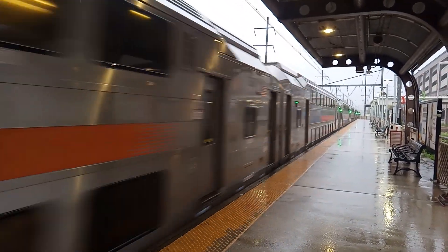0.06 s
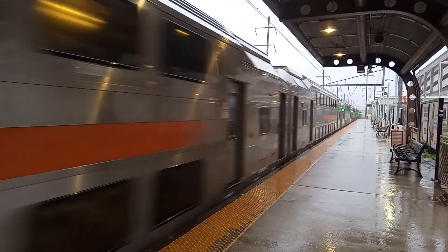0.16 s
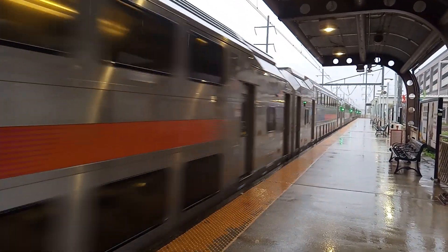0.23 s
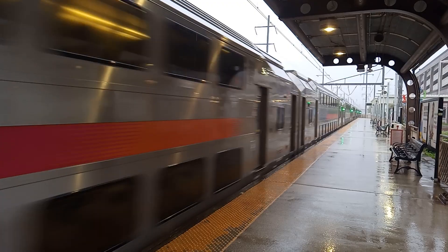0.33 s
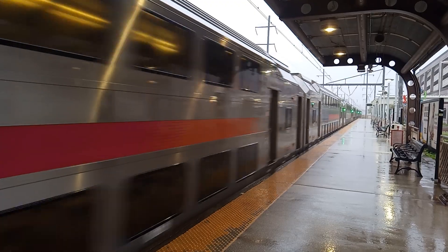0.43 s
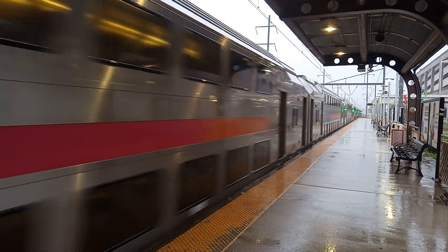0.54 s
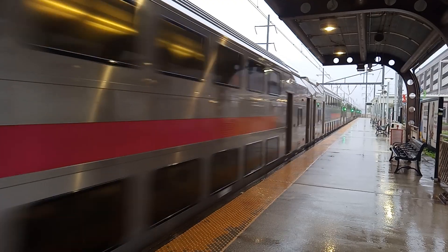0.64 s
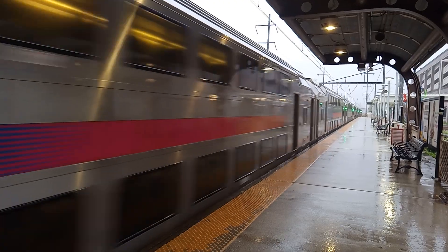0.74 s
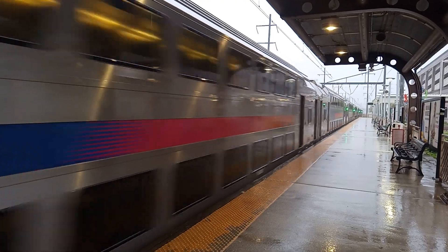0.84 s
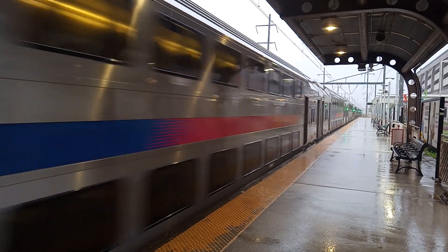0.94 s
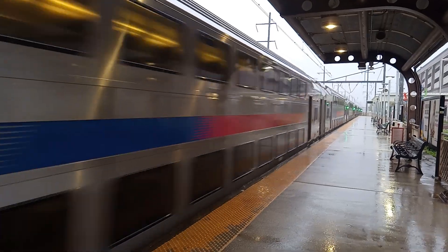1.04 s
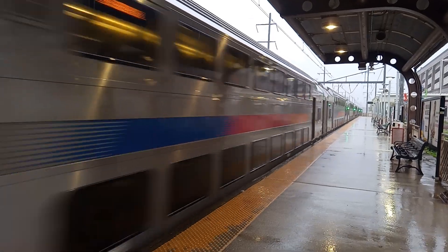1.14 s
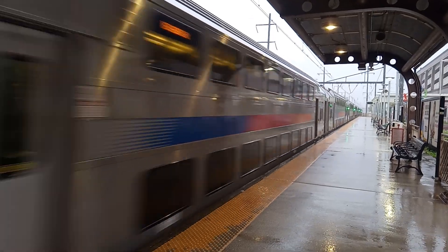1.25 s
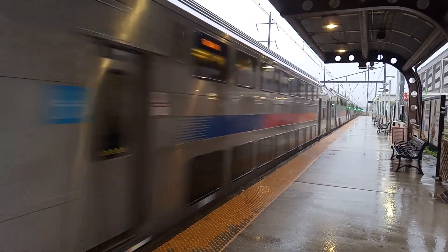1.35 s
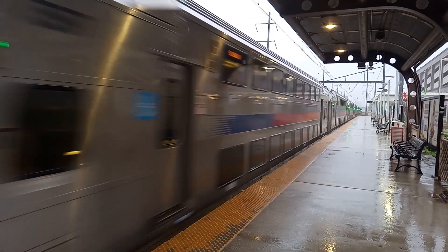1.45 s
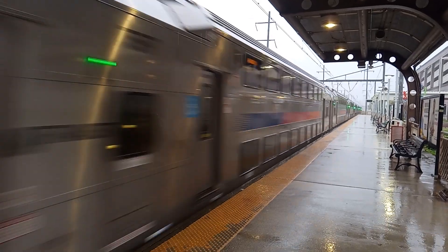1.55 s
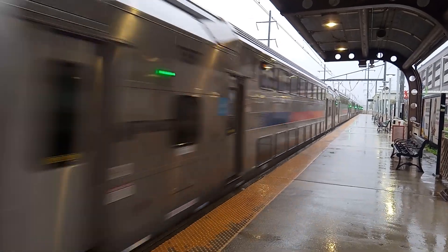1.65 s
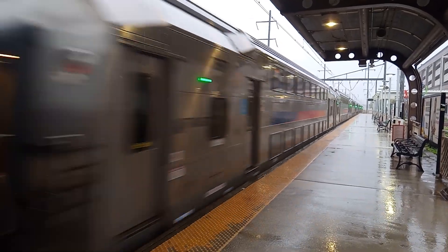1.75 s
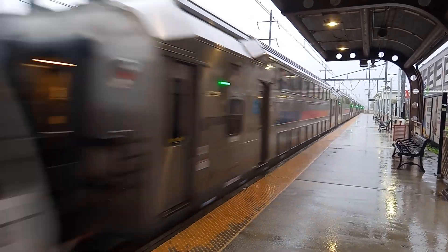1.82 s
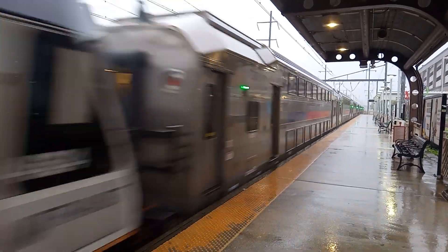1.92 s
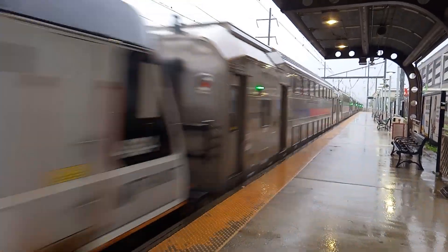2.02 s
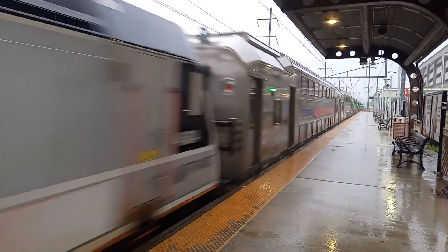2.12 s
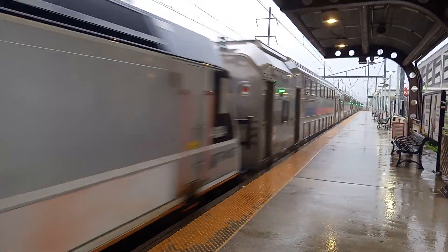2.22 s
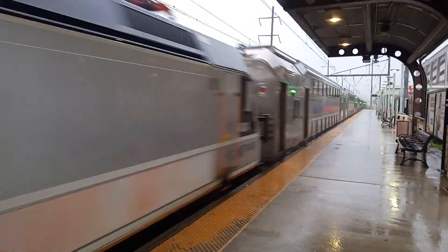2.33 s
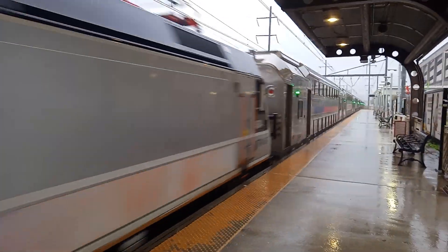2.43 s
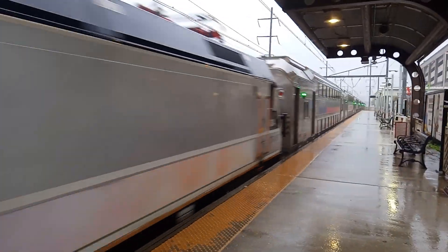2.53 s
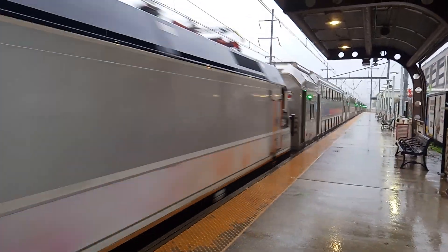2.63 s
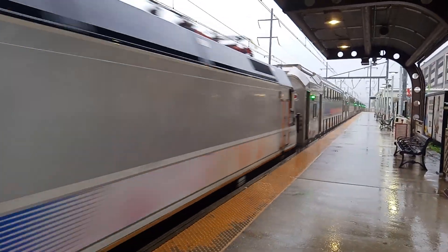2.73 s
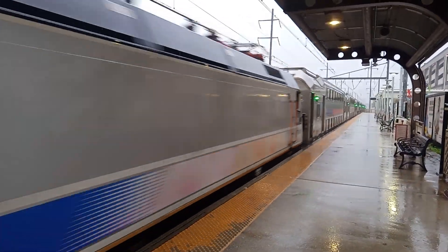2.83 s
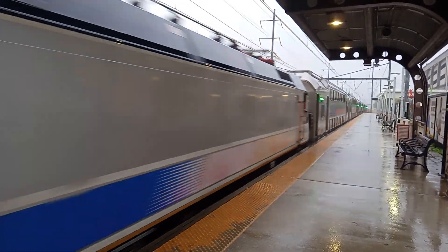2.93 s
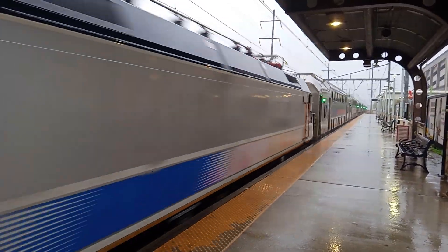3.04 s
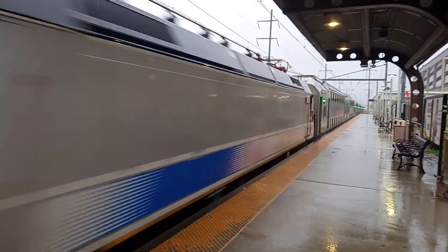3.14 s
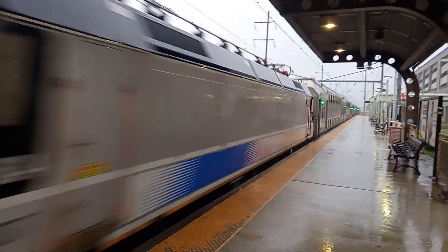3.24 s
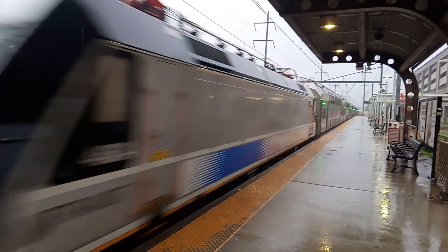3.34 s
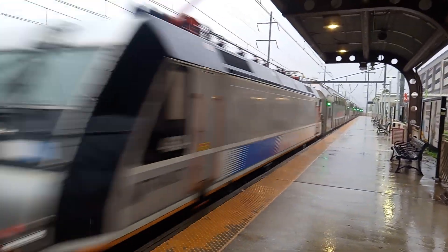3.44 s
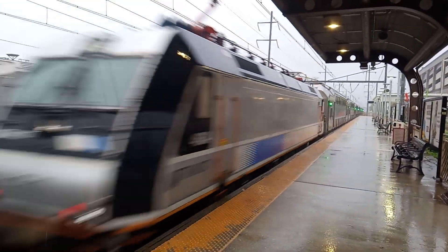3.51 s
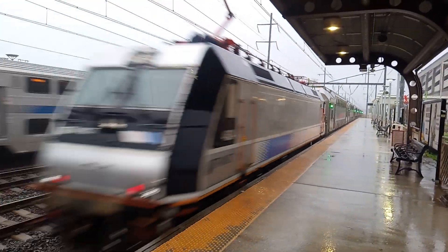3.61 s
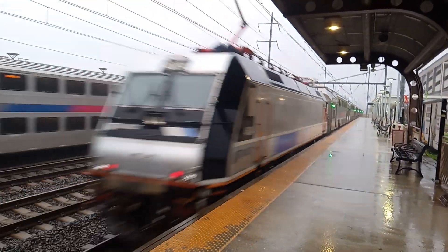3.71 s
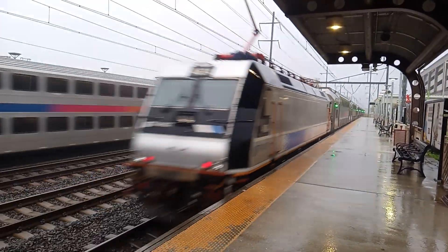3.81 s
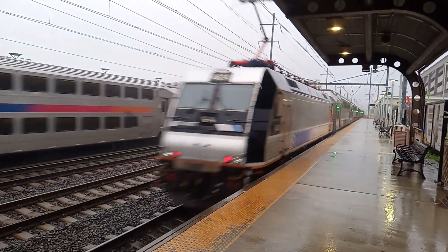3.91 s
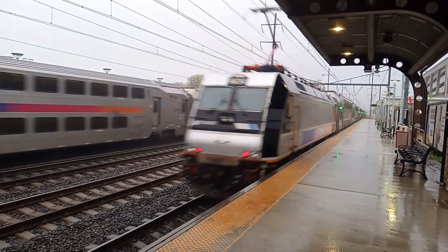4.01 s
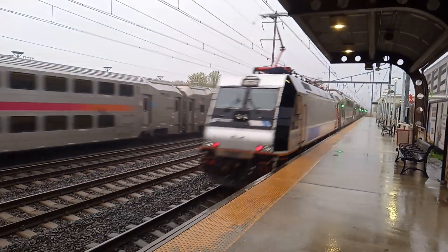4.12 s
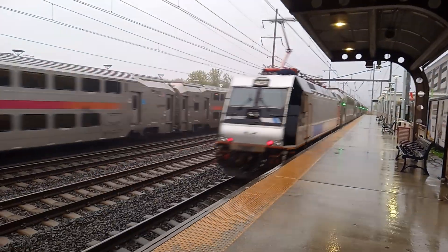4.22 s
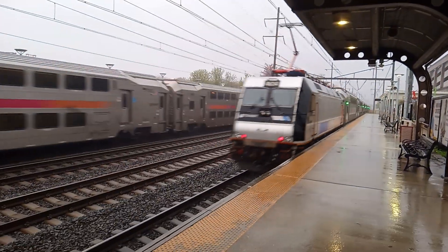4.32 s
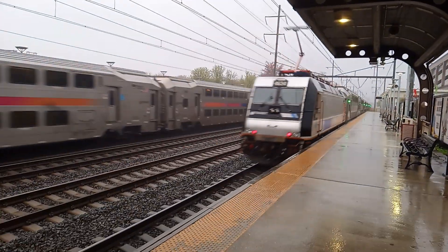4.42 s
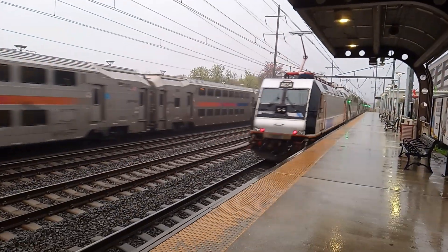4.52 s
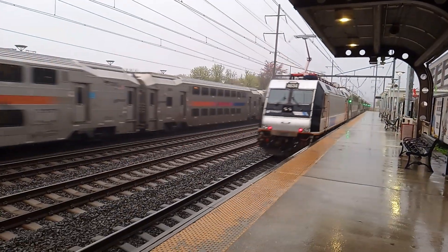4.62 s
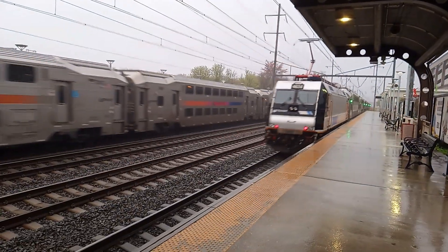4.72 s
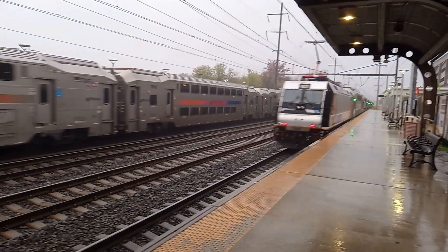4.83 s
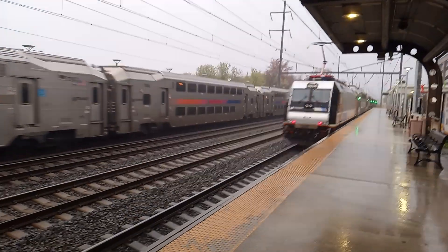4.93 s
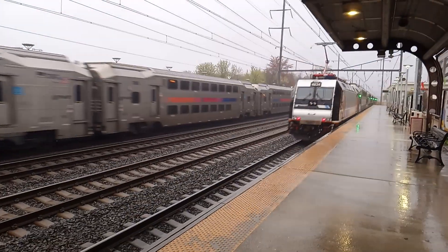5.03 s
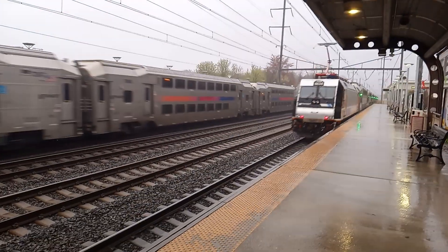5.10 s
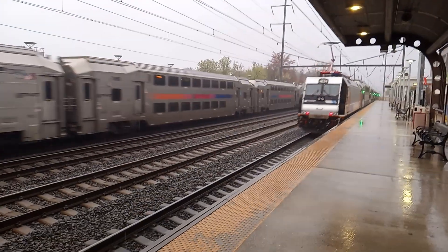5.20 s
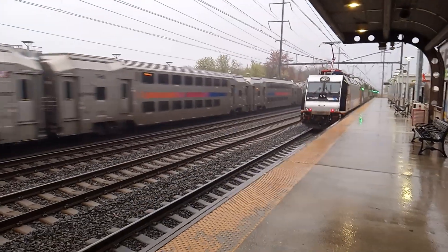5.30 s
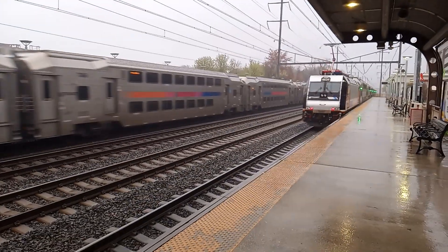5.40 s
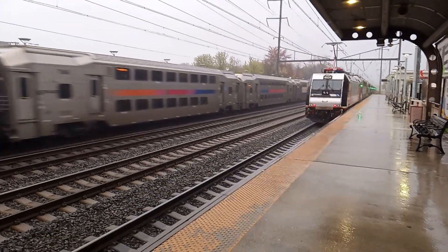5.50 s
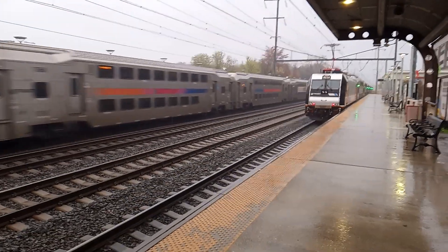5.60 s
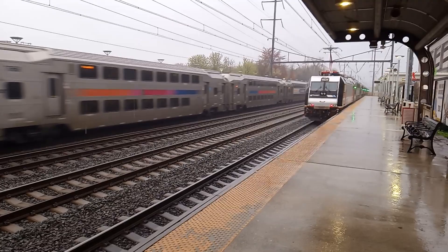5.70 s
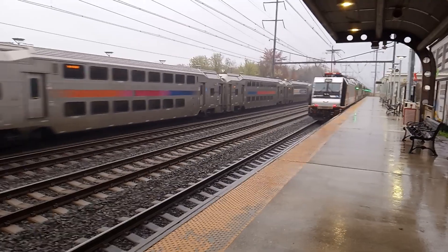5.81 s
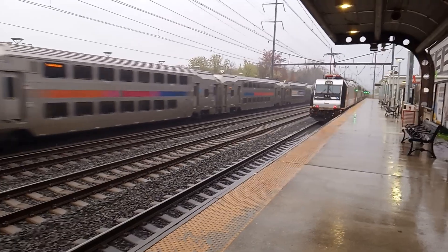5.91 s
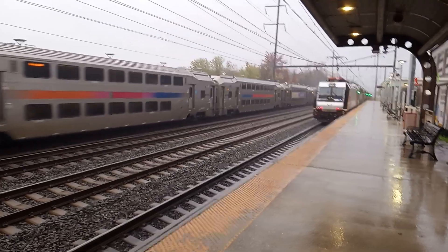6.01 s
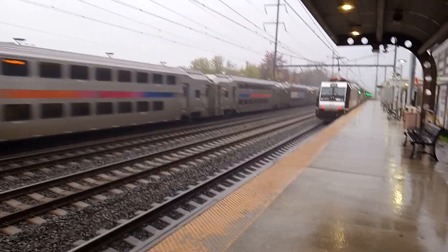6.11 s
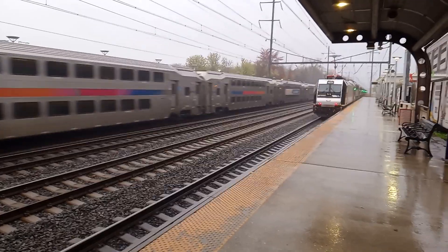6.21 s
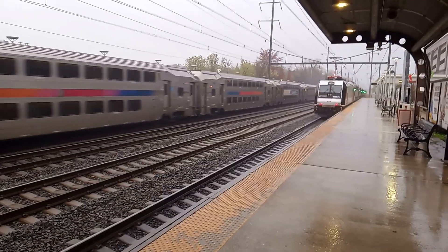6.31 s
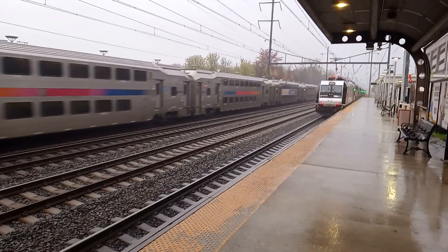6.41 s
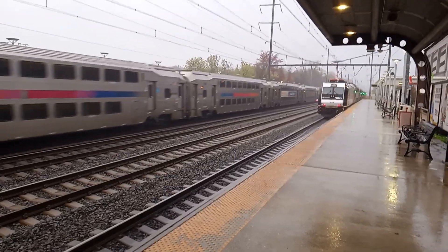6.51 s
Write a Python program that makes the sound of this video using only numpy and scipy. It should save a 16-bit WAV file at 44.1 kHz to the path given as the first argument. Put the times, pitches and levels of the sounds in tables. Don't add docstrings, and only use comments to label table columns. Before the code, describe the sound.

A piercing metallic wheel squeal near 5 kHz sings over a rumbling electric train passing close by a wet platform, then thins as it recedes.

```python
import sys
import numpy as np
from scipy import signal
from scipy.io import wavfile
from scipy.ndimage import uniform_filter1d, minimum_filter1d

SR = 44100
rng = np.random.default_rng(int(sys.argv[2]) if len(sys.argv) > 2 else 0)


def makeup_ratio(level_db):
    decades = np.asarray(level_db, float) / 20
    return 10 ** decades


def materialize(psi):
    bounded = np.clip(np.atleast_2d(psi).T, -1, 1)
    quanta = np.round(bounded * 32767).astype(np.int16)
    wavfile.write(sys.argv[1], SR, quanta)


N = 288842
HZ = np.fft.rfftfreq(2048, 1 / SR)[:, None]
TIMES = np.arange(N // 512 + 5) * 512 / SR
SAMPLE_TIMES = np.arange(N) / SR


def evened(x):
    return x / np.sqrt(np.mean(x ** 2) + 1e-20)


def smoothed(x, size):
    return uniform_filter1d(uniform_filter1d(x, size=size), size=size)


def columns(rows, times=TIMES):
    s, *values = np.transpose(rows)
    return [np.interp(times, s, v) for v in values]


def read(points):
    f, value = np.transpose(points)
    return np.interp(np.log(HZ + 1), np.log(f + 1), value)


def share(power):
    return power / power.sum(0)


def mode(hz, width_hz, steep=1.143):
    offset = 2 * (HZ - hz) / np.maximum(width_hz, 8)
    return share((1 + offset ** 2) ** -steep)


def placed(power, level_db, pan_db=0.):
    left = power * makeup_ratio(level_db + pan_db / 2) ** 2
    right = power * makeup_ratio(level_db - pan_db / 2) ** 2
    return np.array([left, right])


def panned(x, level_db, pan_db):
    return x * makeup_ratio(level_db + np.array([[.5], [-.5]]) * pan_db)


def bumps(rows, times):
    s, length_s, *values = np.transpose(rows)
    swell = np.exp(-((times - s[:, None]) / length_s[:, None]) ** 2)
    return np.array(values) @ swell


def surges(rows, rest_db):
    power_rows = [(s, length_s, *makeup_ratio(np.array(db)) ** 2) for s, length_s, *db in rows]
    rest = makeup_ratio(np.reshape(rest_db, (-1, 1))) ** 2
    level_db = 10 * np.log10(bumps(power_rows, TIMES) + rest)
    return [np.interp(SAMPLE_TIMES, TIMES, row) for row in level_db]


def flutter(hz, depth_db):
    lowpass = signal.butter(4, hz, fs=SR, output="sos")
    wobble = signal.sosfilt(lowpass, rng.standard_normal((3, N)))
    wobble = 2 * np.tanh(evened(wobble[:2] + wobble[2]) / 2)
    return makeup_ratio(depth_db * wobble - .115 * depth_db ** 2)


def sounded(power, patchy_db, size=9):
    # hz, likeness of the sides
    likeness = [(30, 0.53), (100, 0.99), (300, 0.87), (600, 0.5), (1200, 0.067), (2500, 0.046),
                (5000, 0.15), (16000, 0.067)]
    # time_s, left_lag_samples
    left_lag = [(0, 17), (1, 9.5), (1.8, 19), (3.3, 21.5), (4, 10), (5, 2.5), (6.6, -3)]
    a, b, c, d, patches = rng.standard_normal((len(TIMES), len(HZ), 5)).T
    patches = evened(uniform_filter1d(uniform_filter1d(patches, size, 0), size=8, axis=1))
    same = np.clip(read(likeness), 0, 1)
    right = a + 1j * b
    late = np.exp(-2j * np.pi * HZ * columns(left_lag)[0] / SR)
    left = late * (same * right + np.sqrt(1 - same ** 2) * (c + 1j * d))
    z = np.array([left, right]) * np.sqrt(power) * makeup_ratio(patchy_db * patches)
    return 1.244 * signal.istft(z, nperseg=2048, noverlap=1536)[1][:, :N]


def line(hz, width_hz, level_db, pan_db=0., steady=0.14, own=1.0):
    a, b = rng.standard_normal((2, 3, N))
    lowpass = signal.butter(2, max(width_hz, 2) / 2, fs=SR, output="sos")
    beat = signal.sosfilt(lowpass, a + 1j * b)
    beat = steady + (own * beat[:2] + (1 - own) * beat[2]) / np.std(beat)
    carrier = np.exp(2j * np.pi * np.cumsum(hz * np.ones(N)) / SR)
    return panned(evened((beat * carrier).real), level_db, pan_db)


def squeal():
    # time_s, level_db, pan_db
    pressure = [(0, -19.5, -2.5), (.85, -20.5, -4.5), (1.3, -15, -1.5), (1.75, -11, -0.5), (2.15, -14, 4.5),
                (2.55, -21, 0.5), (3.1, -21.5, 1), (3.45, -18.5, -1.5), (3.6, -12.5, -3.5), (4.05, -15, 0),
                (4.3, -22.5, 0.5), (5, -25.5, -0.5), (5.7, -29, -0.5), (6.15, -25.5, 3.5), (6.55, -36, 3)]
    # time_s, length_s, level_db, pan_db
    bites = [(.62, 0.11, 4.5, 1.5), (1.02, .04, 7, 1), (1.4, 0.1, 1.5, -0.5), (1.53, 0.068, -2, -4),
             (2.22, 0.042, -6.5, 4), (2.42, 0.025, 5.5, -2.5), (2.8, 0.037, 2, 5.5), (3.03, 0.043, 1.5, 5),
             (3.1, .04, -3, -5), (3.61, 0.056, 10, 3.5), (3.685, 0.0071, -7.5, 1.5), (3.715, 0.03, 6, 4.5),
             (3.88, 0.014, 5.5, -1), (4.33, .02, -4, -3), (4.4, 0.042, 7, 3), (4.62, 0.024, 7.5, 2),
             (5.02, 0.024, 5, -5), (5.75, .05, -10.5, 3), (5.85, 0.13, 4.5, 0), (6.18, 0.049, 4, -2),
             (6.27, 0.051, -2, -6)]
    # time_s, centre_hz, width_hz
    glide = [(0, 5240, 220), (1.2, 5270, 165), (1.75, 5215, 100), (2.15, 5155, 90), (2.6, 5120, 130),
             (3.6, 5145, 80), (4.15, 5095, 70), (4.6, 5110, 170), (5.0, 5050, 90), (6.6, 5020, 40)]
    # hz, width_hz, level_db
    close_modes = [(5013, 24, 10), (5135, 71, 4), (5230, 100, 0), (5230, 140, 0.5), (5320, 17, 7.5)]
    hz, width_hz = columns(glide)
    skirt_hz = 5200 + .6 * (hz - 5150)
    skirt_db = -3.5 - 1.5 * bumps(bites, TIMES)[0] - .7 * (columns(pressure)[0] + 20)
    skirt = makeup_ratio(skirt_db) ** 2 * mode(skirt_hz, 450 + 0.2 * (skirt_hz - 5200), steep=2.5)
    close_db = sum(db / (1 + (2 * (HZ - f) / w) ** 2) for f, w, db in close_modes)
    core = mode(hz, 1.56 * width_hz, steep=2.63)
    shape = share((core + skirt) * makeup_ratio(close_db) ** 2)
    song = sounded(placed(shape, 0.), patchy_db=2.0)
    swing = smoothed(song ** 2, 1100)
    grip = 0.58
    song = evened(song / (swing + .02) ** (grip / 2))
    level_db, pan_db = columns(pressure, SAMPLE_TIMES) + bumps(bites, SAMPLE_TIMES)
    return panned(song, level_db, pan_db)


def overtones():
    # time_s, length_s, second_partial_db, third_partial_db
    locks = [(0, .05, -30, -43), (.25, 0.25, -31, -48), (.62, 0.059, -27.5, -47), (1.1, 0.045, -35, -45),
             (1.72, 0.14, -45.5, -32), (2.15, 0.26, -61, -34), (3.68, 0.093, -33, -34),
             (3.8, 0.15, -32, -37), (4.04, .09, -30.5, -28), (4.4, 0.16, -41, -39), (4.67, 0.032, -39, -34),
             (4.78, 0.089, -37, -42), (5.02, 0.094, -37.5, -32), (5.22, 0.049, -37, -33),
             (5.38, 0.05, -36.5, -28), (5.54, 0.12, -42.5, -34), (5.72, 0.12, -40.5, -51),
             (6.05, 0.13, -38, -35), (6.45, 0.18, -46, -40)]
    # time_s, pitch_hz, first_over_second_db
    ring_pitch = [(0, 5204, 0), (1.3, 5204, 0), (2.0, 5175, 0), (3.9, 5163, 0), (4.3, 5160, 10),
                  (6.1, 5156, 4), (6.6, 5156, 10)]
    ring_widths_hz = (14, 20.5, 28)
    # time_s, level_db, sharpness_db, pan_db
    harshness = [(0, -37, 2, -2), (.45, -47, 3, -7), (.75, -41.5, 3, -6.5), (1.0, -46, 4, -5),
                 (1.15, -45.5, 7.5, -7.5), (1.66, -43.5, 10.5, -7.5), (2.08, -49.5, 22, -3.5),
                 (3.2, -52.5, 15, -1.5), (3.6, -40.5, 12, -3.5), (4.2, -53.5, 14, -2), (5, -52, 14, -5),
                 (5.6, -66, 29, 2), (6.07, -55, 15, -4.5), (6.55, -60, 24, 5)]
    smear_hz = (10330, 15230)
    second_db, third_db = surges(locks, (-53.5, -53.5))
    wander = evened(smoothed(rng.standard_normal(N), 4000))
    pan_db = columns(harshness, SAMPLE_TIMES)[2] + 1 + 3.0 * wander
    hz, first_db = columns(ring_pitch, SAMPLE_TIMES)
    partials_hz = hz, 2 * hz, 15472
    partials_db = second_db + first_db, second_db + 3.0, third_db + 0.5
    partials = zip(partials_hz, ring_widths_hz, partials_db)
    ring = sum(line(f, w, level_db, pan_db) for f, w, level_db in partials)
    slip_db, sharp_db, wide_pan_db = columns(harshness)
    bands = zip(smear_hz, (1030, 820), (slip_db + 3, slip_db + sharp_db))
    smear = sum(placed(mode(f, w, steep=2.87), level_db, wide_pan_db) for f, w, level_db in bands)
    return (ring + sounded(smear, patchy_db=1.0)) * flutter(hz=37.3, depth_db=1.14)


def flares():
    A, B, C, D, E, F, G = 1660, 2655, 3165, 3722, 6570, 8380, 13000
    J, K, L, M, P, Q, R, S, T, U = 2030, 2380, 2570, 3030, 3575, 4220, 6720, 10080, 12050, 12900
    # start_s, end_s, pitch_hz, level_db
    near_flares = [(-.5, 0.31, B, -49), (-.1, 0.49, C, -54), (0.34, .72, C, -48), (-0.3, 0.34, D, -55),
                   (.52, 1.75, D, -40.5), (0.3, 1.43, B, -56.5), (1.23, 2.2, B, -54), (1.1, 2.0, E, -52),
                   (-0.5, 0.82, F, -64), (-3.5, 2.9, G, -61), (1.3, 1.53, A, -50.5), (2.06, 2.13, A, -48.5),
                   (2.5, 2.95, A, -56.5)]
    # start_s, end_s, pitch_hz, level_db
    far_flares = [(3.95, 4.45, Q, -48), (3.97, 4.28, L, -50.5), (4.05, 5.1, P, -51.5), (4.14, 5.55, M, -47),
                  (5.0, 5.7, L, -51), (5.4, 5.8, P, -54), (4.4, 5.6, Q, -56), (6.0, 6.35, P, -53.5),
                  (5.5, 5.95, M, -52), (6.05, 6.4, M, -54), (5.9, 6.45, L, -57.5), (4.3, 5.5, J, -59),
                  (4.2, 4.83, R, -55), (4.8, 6.8, T, -64), (4.0, 7.2, U, -59.5), (4.64, 6.6, S, -53.5),
                  (4.5, 5.25, K, -63)]
    # start_s, end_s, pitch_hz, level_db
    whistles = [
        (3.35, 3.78, 2750, -57),
        (3.3, 3.75, 6600, -57),
        (4.4, 6.4, 8380, -68.5),
    ]
    # start_s, end_s, pitch_hz, level_db
    booms = [
        (.75, 1.05, 467, -46),
        (1.15, 1.35, 443, -42),
        (1.5, 1.85, 137, -43.5),
        (1.95, 2.4, 317, -36.5),
    ]
    power = 0
    for rows, q in ((near_flares, 39), (far_flares, 33), (whistles, 130), (booms, 5.2)):
        for start_s, end_s, hz, db in rows:
            phase = np.clip((TIMES - start_s) / (end_s - start_s), 0, 1)
            swell = np.minimum(1.44 * abs(np.sin(np.pi * phase)), 1) ** 2.67
            width_hz = hz / q / (1 + .5 * max(start_s - 4.2, 0))
            power = power + placed(mode(hz, width_hz, steep=1.14) * swell, db + 5.5, -0.92)
    return sounded(power, patchy_db=2.0, size=4) * flutter(hz=30.5, depth_db=0.2)


def rolling():
    # time_s, level_db
    nearness = [(0, -10.5), (.7, -9), (1.0, -4.5), (1.9, 1.5), (2.4, -4.5), (3.0, -1), (3.3, -1.5),
                (3.4, -5), (3.8, -10), (4.8, -17), (6.0, -19.5), (6.55, -17.5)]
    # time_s, level_db
    thuds = [(.22, 9), (.48, 5.5), (.8, 3), (.99, 4), (1.09, 8), (1.24, 7), (1.42, 4), (1.64, 3.5),
             (2.3, 7.5), (2.48, 10), (2.68, 5), (2.769, 5.5), (3.32, 6), (4.78, 2), (5.3, 7), (5.891, 9.5),
             (6.31, 9.5)]
    # level_db, share of nearness followed, share of a thud
    roll_layers = [
        (-43.5, 0.45, 1.0),
        (-34, 0.98, 0.015),
        (-48, 0.37, -0.0017),
    ]
    # time_s, level_db
    spray = [(0, -54), (.5, -54.5), (.75, -55.5), (2.9, -71), (3.6, -55), (4.0, -55.5), (4.4, -46),
             (5.2, -51), (5.8, -54.5), (6.1, -54.5), (6.6, -57.5)]
    # hz, db_per_hz
    rumble = [(20, -39), (40, -23), (62, -16), (85, -2), (180, -3.5), (250, -9.5), (400, -28), (600, -53)]
    roar = [(120, -46.5), (220, 1.5), (330, -5.5), (450, -3.5), (620, -7.5), (900, -14), (1300, -38.5)]
    hiss = [(500, -5.5), (900, -2), (2050, -2.5), (2290, -10), (2550, -5.5), (3350, -11), (3700, -9),
            (4050, -14), (4400, -2), (5500, -11.5), (7000, -36)]
    fizz = [(5000, -3), (6200, 4.5), (8400, -2.5), (9000, -2), (11300, -21), (12000, -8.5), (13300, -12.5),
            (14100, -14), (16500, -18)]
    near_db = columns(nearness)[0]
    thud_s = 0.035
    thud_db = bumps([(s, thud_s, db) for s, db in thuds], TIMES)[0]
    levels_db = [db + follow * near_db + shake * thud_db for db, follow, shake in roll_layers]
    layers = zip((rumble, roar, hiss, fizz), levels_db + columns(spray), (0.5, -2.5, 4.04, 5.0))
    power = 0
    for shape, level_db, trim_db in layers:
        power = power + placed(share(makeup_ratio(read(shape)) ** 2), level_db + trim_db, -0.49)
    return sounded(power, patchy_db=3.0, size=3) * flutter(hz=13.3, depth_db=2.0)


def hum():
    # time_s, length_s, low_line_db, high_line_db
    motor_surges = [(.12, 0.15, -53.5, -49.5), (0.903, 0.17, -66, -46.5), (1.5, 0.28, -49, -45.5),
                    (2.028, 0.097, -41.5, -33.5), (2.17, .05, -39, -57), (2.442, 0.057, -60, -36),
                    (2.687, 0.045, -30.5, -47), (2.757, 0.027, -59, -36.5), (2.982, 0.096, -32.5, -33),
                    (3.248, 0.16, -35, -39), (3.545, 0.17, -41.5, -43), (3.914, 0.089, -39.5, -40.5),
                    (4.297, 0.36, -46.5, -49), (4.913, .08, -37.5, -63), (5.673, 0.18, -47, -51.5),
                    (6.2, 0.49, -50, -62)]
    # time_s, length_s, level_db
    whine = [(1.3, 0.55, -53.5), (2.267, 0.067, -52.5), (2.423, .04, -44.5), (2.58, .04, -45),
             (2.694, .05, -46.5), (2.84, 0.085, -50), (3.28, 0.11, -56)]
    # pitch_hz, width_hz, level_db
    hum_lines = [
        (264, 21.5, 1),
        (510.5, 34, 0),
        (1198, 46, 2.5),
    ]
    rest_db = -77.5
    levels_db = surges(motor_surges, rest_db) + surges(whine, rest_db)
    out = 0
    for (hz, width_hz, db), level_db in zip(hum_lines, levels_db):
        sink_db = 0.33 * (level_db - level_db.max())
        tone = line(hz, width_hz, level_db + db + sink_db, steady=0.056, own=0.17)
        out = out + tone * flutter(hz=9.9, depth_db=3.0)
    return out


def scene():
    return squeal() + overtones() + flares() + rolling() + hum()


def unmasked(x):
    # hz, db below the loudest band
    mask_db = [(4800, -75), (6000, -49), (7500, -45), (9000, -52.5), (11500, -39.5), (16000, -46.5)]
    # low_hz, high_hz
    valleys_hz = [(2150, 4350), (6300, 9300), (10700, 14400)]
    z = signal.stft(x, nperseg=2048, noverlap=1024)[2]
    power = abs(z[:, :-1]) ** 2
    frames = z.shape[2]
    wide, narrow = (power.reshape(2, -1, size, frames).sum(2).mean(0) for size in (8, 4))
    spare_db = 3 - 4.4 * rng.exponential(1, frames)
    loudest = uniform_filter1d(wide.max(0), size=9) * makeup_ratio(spare_db) ** 2
    heard = np.repeat(wide, 8, 0) > loudest * makeup_ratio(read(mask_db)[:-1]) ** 2
    band_hz = HZ[:-1:4]
    inside = sum((band_hz > lo) & (band_hz < hi) for lo, hi in valleys_hz) > 0
    around = uniform_filter1d(uniform_filter1d(narrow ** .25, size=13, axis=0), size=5, axis=1) ** 4
    lasting = uniform_filter1d(narrow, size=2, axis=1)
    stands_out = ~inside | (lasting > around * makeup_ratio(-4.2) ** 2)
    z[:, :-1] *= heard & np.repeat(stands_out, 4, 0)
    return signal.istft(z, nperseg=2048, noverlap=1024)[1][:, :N]


def top_cut(x):
    return signal.sosfilt(signal.butter(12, 16940, fs=SR, output="sos"), x)


def record(dry):
    room_left = minimum_filter1d(np.minimum(.98 / (abs(dry).max(0) + 1e-9), 1), size=401)
    capsule = signal.butter(2, 48, "high", fs=SR, output="sos")
    held = signal.sosfilt(capsule, dry) * smoothed(room_left, 200)
    edge_hz = 15570
    taps = signal.firwin(1023, edge_hz, window=("kaiser", 9), fs=SR)[None]
    mix = unmasked(signal.oaconvolve(held, taps, "same"))
    return top_cut(mix)


dry = scene()
out = record(dry)
materialize(out)
```